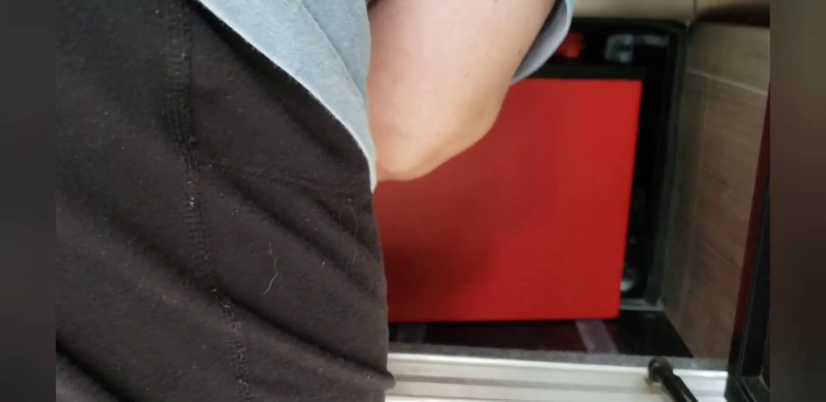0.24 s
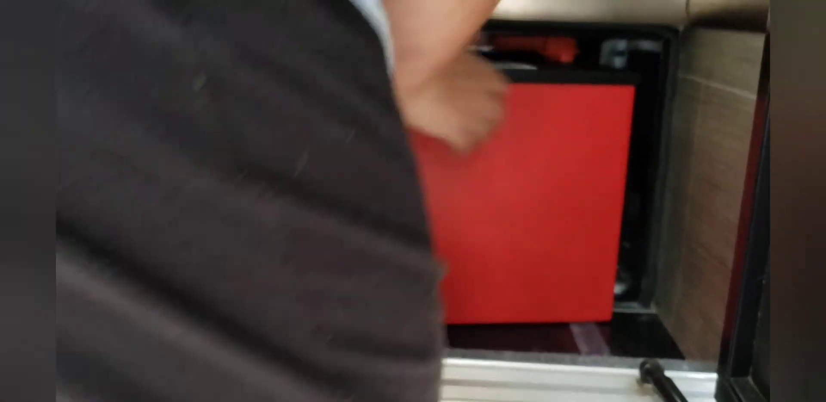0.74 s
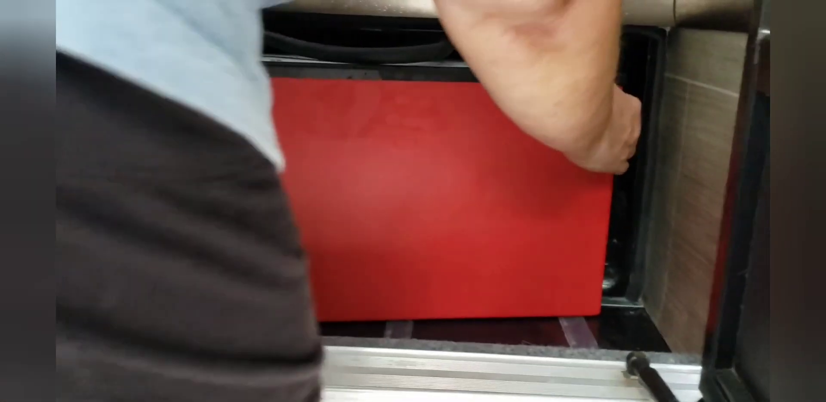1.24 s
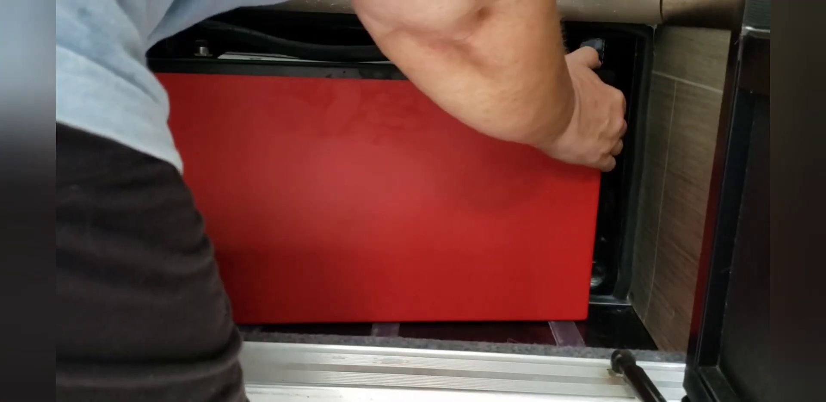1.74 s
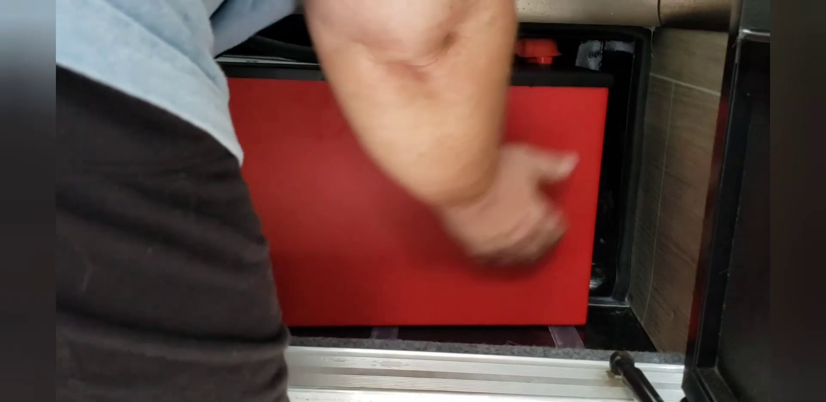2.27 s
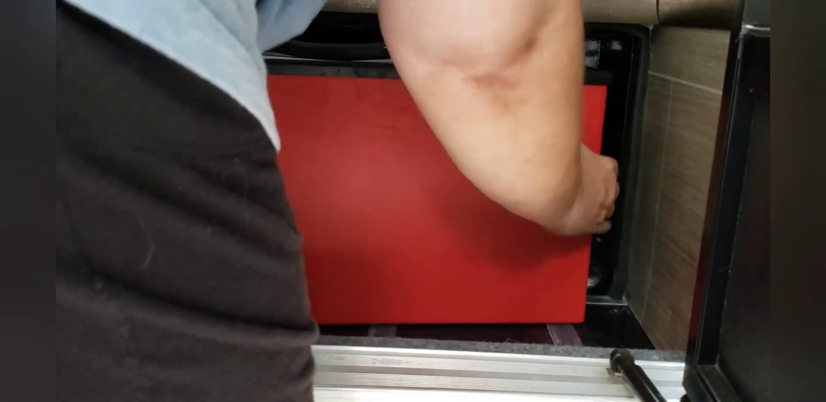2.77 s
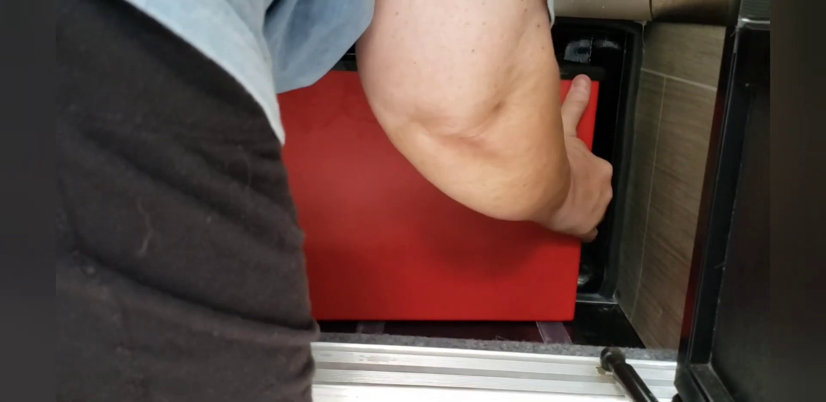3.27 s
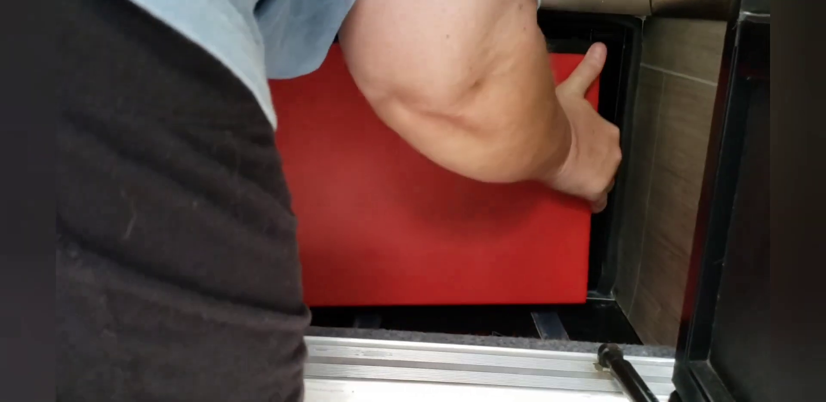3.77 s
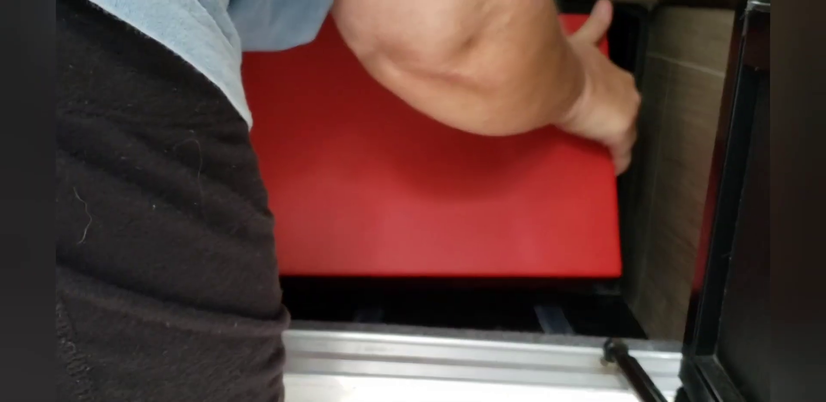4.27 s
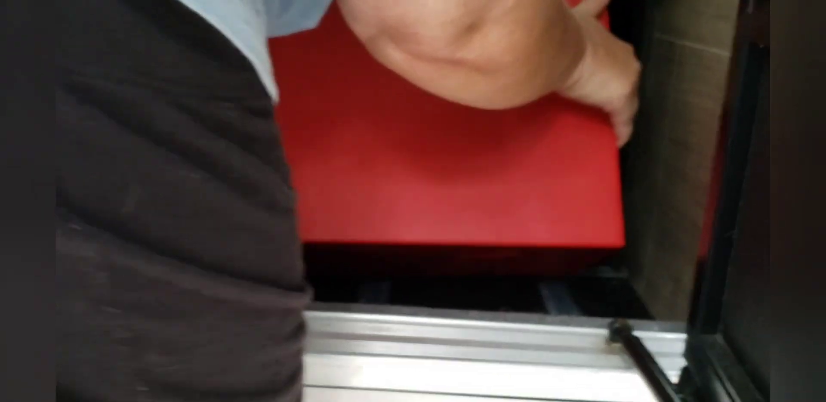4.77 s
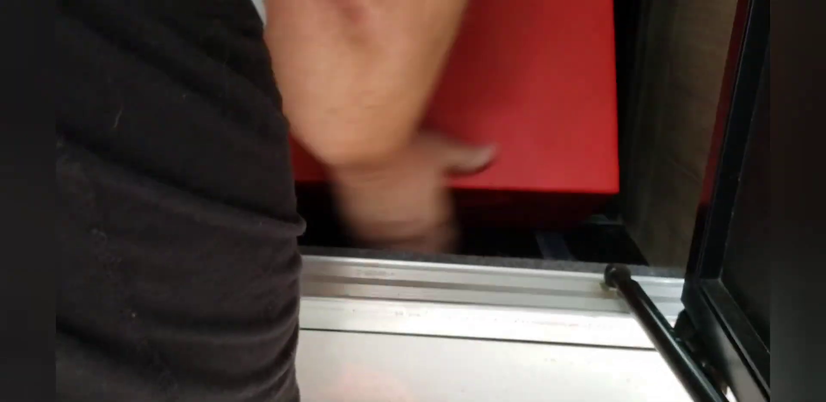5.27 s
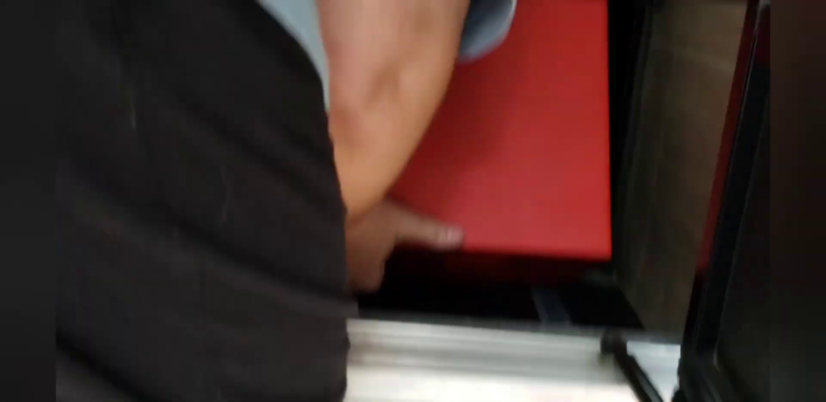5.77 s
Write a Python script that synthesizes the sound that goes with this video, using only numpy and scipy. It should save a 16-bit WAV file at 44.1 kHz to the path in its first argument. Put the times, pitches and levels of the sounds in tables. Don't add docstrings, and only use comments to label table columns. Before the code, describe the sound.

Close stereo pickup inside a small sheet-metal compartment. A heavy case thuds and scrapes briefly, then quiet handling and small ticks. It rocks with two hard snaps and ringing knocks, lands, groans slowly, skids and chatters in a long scrape, squeaks, then gives one very loud crack. Soft skin and cloth rubbing and a last shove follow. A low motor hums throughout.

```python
import sys
import numpy as np
from scipy import signal
from scipy.fft import rfft, irfft, next_fast_len
from scipy.io import wavfile

SR = 44100
rng = np.random.default_rng(int(sys.argv[2]) if len(sys.argv) > 2 else 0)


def natural_amplitude(level_db):
    exponent = np.asarray(level_db, float) / 20
    return 10 ** exponent


def transcribe(u):
    v = np.clip(np.atleast_2d(u).T, -1, 1)
    q = np.round(v * 32767).astype(np.int16)
    wavfile.write(sys.argv[1], SR, q)


N = 265041

LONG = next_fast_len(N + SR // 3)
HZ = np.maximum(np.fft.rfftfreq(LONG, 1 / SR), 1)
GROAN_LOSS_DB, SQUEAK_LOSS_DB = 9, 4.5


def friction():
    # frequency in Hz, level in dB per Hz.
    rumble_spectrum = [(35, 10), (60, 3.5), (151, 9.5), (246, -3), (324, 1), (500, -23.5), (650, -28),
                       (1100, -120)]
    drag_spectrum = [(180, 3.5), (300, 3), (562, -4), (662, -2.5), (749, -2.5), (1110, -4.5), (3500, -24),
                     (4550, -73), (7700, -120)]
    grit_spectrum = [(590, -40), (1000, -8), (1300, -5), (1600, -1), (2000, -6), (3000, -8), (8000, -14),
                     (10400, -28), (17600, -120)]
    rasp_spectrum = [(2940, -2), (5000, -2), (7450, 1.5), (9410, -0.5), (12100, -6), (16000, -4)]
    hiss_spectrum = [(2940, -12.5), (5000, -5), (6930, -1.5), (9100, 4), (10100, 0.5), (14700, 6.5),
                     (16000, 0)]
    # frequency in Hz, width in Hz, level in dB.
    shell_modes = [(1520, 200, 7), (2230, 140, 2.5), (620, 120, 4)]
    weight_db, drag_db, grit_db, hiss_db = handling()

    weight = colour(grains(900, 1.9), rumble_spectrum, ring_db=1.5)
    weight = weight * natural_amplitude(weight_db + 0.5 * drift(25))

    clumps = drift(22)
    drag = colour(grains(2500, 2.2), drag_spectrum, ring_db=1)
    drag = drag * natural_amplitude(drag_db + 0.7 * drift(30) + 0.6 * clumps)

    grit = colour(grains(3000, 3.6), grit_spectrum, ring_db=1)
    grit = grit * natural_amplitude(grit_db + 1.8 * clumps + 1.2 * drift(90))
    hum = sum(natural_amplitude(db) * resonate(grit, hz, width) for hz, width, db in shell_modes)
    grit = natural_amplitude(-5.0) * (grit + hum)

    fine = grains(15000, 3.8)
    hard = np.clip((grit_db - hiss_db + 9.0) / 7, 0, 1)
    rasp = np.sqrt(hard) * colour(fine, rasp_spectrum, ring_db=-30)
    soft = np.sqrt(1 - hard) * colour(fine[::-1], hiss_spectrum, ring_db=-35)
    hiss = (rasp + soft) * natural_amplitude(hiss_db + 0.5 * clumps + 1.3 * drift(40))
    return weight + drag + grit + hiss


def handling():
    # peak in seconds, seconds to rise 20 dB, seconds to fall 20 dB,
    # rumble in dB, panel drag above its usual share in dB.
    slides = [(.19, .04, .02, -45, -9), (.25, .035, .08, -31, -7), (.346, .015, .11, -35, -12),
              (1.448, .12, .05, -53, -9), (1.536, .1, .15, -53, -3), (1.69, .12, .14, -39, 1),
              (1.78, .06, .075, -38, -6), (1.97, .03, .03, -37, -11), (2.02, .04, .035, -35, -4),
              (2.17, .06, .07, -52, -1), (2.75, .06, .05, -57, 3), (3.16, .15, .08, -55, 1.5),
              (3.63, .12, .8, -66, 19), (3.75, .3, .4, -64, 20), (3.8, .05, .5, -43, 1),
              (3.93, .25, .2, -44, 1), (2.585, .005, .2, -48, .3), (4.085, .12, .3, -52, 12),
              (4.182, .16, .1, -35.5, 2.5), (4.96, .3, .1, -46, -7), (5.084, .005, .05, -49, 2.5),
              (5.796, .2, .3, -51, -9), (5.916, .15, .08, -45, -1), (5.388, .015, .15, -40, -5)]
    # peak in seconds, seconds to rise 20 dB,
    # seconds to fall 20 dB, grit in dB, hiss above its share in dB.
    rattles = [
        (1.738, .003, .045, -31, 2.5),
        (1.98, .003, .05, -35, -1.5),
        (2.584, .016, .14, -50, 5),
        (5.085, .002, .07, -38, -8),
        (5.101, .012, .012, -28, -11),
        (5.112, .01, .11, -45, -2),
        (5.376, .008, .05, -55, 7),
        (5.395, .04, .09, -53, 7),
        (5.91, .13, .11, -51, 5),
    ]
    # peak in seconds, seconds to rise 20 dB,
    # seconds to fall 20 dB, hiss in dB, grit above its share in dB.
    rubs = [(.344, .03, .05, -60, -5), (1.536, .07, .1, -61, -5), (1.71, .25, .1, -61, 8),
            (2.53, .05, .1, -66, -3), (3.8, .8, .8, -61, 6), (4.7, .3, .05, -56, -6),
            (4.99, .1, .3, -55, -4), (5.31, .05, .05, -60, -5), (5.525, .03, .25, -52, -20),
            (5.59, .14, .06, -47, -22), (5.647, .012, .03, -56, -10)]
    # start in seconds, length in seconds,
    # grit in dB, swell over the stroke in dB, rasp above its share in dB.
    scrapes = [
        (.2, .042, -32.5, 1, -1),
        (4.732, .11, -43, -2, 4),
        (4.86, .072, -51, 0, 10),
    ]
    eased_scrapes = [
        (4.105, 0.06, -38, -0.5, -5.5),
        (4.175, 0.055, -39.5, -3.5, -2.5),
        (4.308, 0.029, -45.5, -5.5, 0),
        (4.358, 0.099, -41, 2.5, -4.5),
        (4.47, 0.038, -38.5, -0.5, -8.5),
        (4.51, 0.026, -41, -2, -2),
    ]
    # level in dB, share of the last stroke column from 0 to 1, relative fall time.
    slide_mix = [(3, 0.01, 0.9), (2, 0.92, 0.55), (-24, 0.9, 0.21), (-18, 1, 0.97)]
    rattle_mix = [(-18, 0, 1.3), (-6, 0, 1.2), (0, 0, 1), (0, 1, .8)]
    rub_mix = [(-30, 0, 1), (-30, 0, 1), (0, 1, 1), (0, 0, 1)]
    scrape_mix = [(-40, 0, 1.3), (-0.5, 0.5, 1.8), (2, 0.58, 0.92), (0, 0.94, 0.73)]
    # time in seconds, level in dB.
    grip = [(0, -2), (.15, -1), (.4, 2.5), (.75, 6.5), (1.3, 6.5), (1.6, 3.5), (1.87, 1.5), (1.93, -0.5),
            (2.07, 0), (2.2, 5), (2.42, -0.5), (2.75, 4.5), (3.0, 4.5), (3.48, -2.5), (4.6, 5), (5.05, 6.5),
            (5.21, -16), (5.5, -15), (5.8, 7.5), (6.01, 1.5)]
    grip_mix_db = [-65, -66.5, -69.5, -70.5]

    grip_db = in_time(grip)[0][::32]
    power = natural_amplitude(2 * (grip_db + np.array(grip_mix_db)[:, None]))
    for rows, mix in (slides, slide_mix), (rattles, rattle_mix), (rubs, rub_mix):
        power += strokes([(s, rise, 1e-3, fall, db, 0, extra) for s, rise, fall, db, extra in rows], mix)
    for rows, attack_s in (scrapes, 0.004), (eased_scrapes, 0.025):
        held = [(s, attack_s, length, 0.042, *dbs) for s, length, *dbs in rows]
        power += strokes(held, scrape_mix)
    return [np.interp(np.arange(N), np.arange(0, N, 32), 10 * np.log10(layer)) for layer in power]


def strokes(rows, mix):
    t, power = np.arange(0, N, 32) / SR, 0
    share_db, share, slow = np.transpose(mix)[..., None]
    for s, rise_s, hold_s, fall_s, db, swell_db, extra_db in rows:
        held = np.clip(t - s, 0, hold_s)
        before = np.maximum(s - t, 0) / max(rise_s, 0.001)
        after = (np.maximum(t - s, 0) - held) / max(fall_s, 0.001)
        top_db = db + share_db + share * extra_db
        power += natural_amplitude(2 * (top_db + swell_db * held / hold_s - 20 * before - 20 * after / slow))
    return power


def grains(per_s, spread_db):
    chance = rng.random((2, N))
    caught = chance < per_s / SR
    sizes = natural_amplitude(spread_db * np.minimum(rng.exponential(1, (2, N)), 4) * caught)
    return np.where(chance < per_s / SR / 2, sizes, -sizes) * caught


def colour(x, spectrum, ring_db):
    # frequency in Hz, width in Hz, level in dB.
    panel = [(258, 21, 4), (513.1, 12.6, 16), (661, 126, 6.5), (839, 5.9, 14), (1052.6, 16, 11),
             (1492, 23, 4), (1747, 28, 5.5), (2160, 34, 9), (2486, 34, 2.5), (2644, 47, 11), (3010, 580, 1),
             (3960, 280, 8.5), (383.2, 51.4, 2.5), (6160, 73, 14)]
    modes = 0
    for k, (hz, width, db) in enumerate(panel):
        modes = modes + (-1) ** k * natural_amplitude(db) / (1 + 2j * (HZ - hz) / max(width, 8))
    return rms_one(to_time(to_hz(x) * natural_amplitude(at_hz(spectrum)) * (1 + natural_amplitude(ring_db) * modes)))


def thumps():
    # start in seconds, peak in dB, pitch in Hz, t60 in seconds.
    landings = [(0.2436, -13, 97.4, 0.13), (0.262, -21, 205, 0.096), (0.341, -25, 94, 0.11),
                (0.972, -29, 205, 0.037), (1.432, -26.5, 82, 0.066), (1.954, -31.5, 210.5, 0.27),
                (2.581, -24.5, 176, 0.032), (4.177, -30, 152.4, 0.32), (4.922, -26.5, 143, 0.091),
                (4.961, -35.5, 124.5, 0.26), (5.4, -28, 199, 0.17), (3.923, -27.5, 144, 0.13)]
    out, t = np.zeros(N), np.arange(SR // 3) / SR
    for s, db, hz, t60 in landings:
        swing = np.sin(2 * np.pi * hz * (t + 0.0033 * (1 - np.exp(-t / 0.049))))
        swing += 0.14 * np.sin(2 * np.pi * 2.31 * hz * t) * natural_amplitude(-60 * t / t60)
        i = round(s * SR)
        swing = (natural_amplitude(db - 60 * t / max(t60, 0.03)) * (1 - np.exp(-t / 0.0034)) * swing)[:N - i]
        out[i:i + len(swing)] += swing
    return out


def snaps():
    # start in seconds, peak in dB, pitch in Hz, t60 in seconds, left minus right in dB.
    bright = [(0.461, -47, 12100, 0.01, -7), (0.574, -53, 14500, 0.0087, -3),
              (0.7935, -33.5, 6000, 0.0091, -1), (0.85, -30, 3700, 0.021, -3),
              (1.381, -41.5, 12100, 0.011, -1), (1.4292, -39, 3280, 0.012, -4),
              (1.7447, -22.5, 4085, 0.067, -12), (1.9808, -22.5, 6100, 0.051, -10.5),
              (2.511, -45, 12000, 0.008, -10), (2.5194, -45, 11800, 0.01, -10),
              (2.536, -41, 12600, 0.0083, -10), (2.762, -47, 13000, 0.008, -5),
              (2.5845, -24.5, 4800, 0.0075, -8), (2.713, -36.5, 5100, 0.0047, -4),
              (5.0833, -31.5, 5400, 0.025, 17), (5.097, -14, 5800, 0.01, 6),
              (5.0995, -8, 3200, 0.014, -1.5), (5.1005, -7.5, 5800, 0.0058, 2),
              (5.1108, -43, 3460, 0.0086, 2), (5.312, -36.5, 7660, 0.0097, -5),
              (5.623, -47, 14000, 0.008, 0), (5.628, -44, 7500, 0.01, 3), (5.641, -35.5, 11300, 0.01, -1),
              (5.655, -48, 14000, 0.008, 0), (5.7, -44, 6700, 0.028, 8), (5.7309, -41.5, 6250, 0.017, 1)]
    return ticks(bright, 0.7, 0.45, 0.03)


def corner_knocks():
    # start in seconds, peak in dB, pitch in Hz, t60 in seconds, left minus right in dB.
    dull = [
        (0.337, -34.5, 528, 0.046, 1),
        (0.85, -45.5, 750, 0.049, -12),
        (1.957, -32, 544, 0.23, 1),
        (2.584, -38.5, 713, 0.035, -21),
        (3.575, -41, 680, 0.038, 2),
        (3.64, -40, 480, 0.066, 3),
        (3.812, -35, 688, 0.25, 8),
        (3.882, -28.5, 610, 0.053, 2),
        (5.374, -32.5, 500, 0.077, 0),
    ]
    return ticks(dull, 0.47, 0, 0.06)


def small_contacts():
    # start in seconds, peak in dB,
    # pitch in Hz, t60 in seconds, left minus right in dB.
    contacts = [(0.85, -31.5, 1350, 0.011, 2), (0.9761, -45, 1220, 0.016, -1),
                (1.4267, -44, 1000, 0.0062, 2), (1.5267, -34, 1390, 0.015, -3),
                (1.5444, -41, 1760, 0.02, 3), (1.7475, -18, 1630, 0.0068, -0.5),
                (1.9845, -20.5, 1570, 0.025, -9.5), (1.749, -22, 994, 0.021, 7),
                (0.343, -49, 1230, 0.027, 0), (5.0845, -31.5, 1080, 0.022, 0),
                (5.101, -19, 2220, 0.0059, 7), (5.6882, -43, 2860, 0.0092, -3),
                (5.7867, -46, 1120, 0.0065, -14),
                (3.912, -44.5, 4120, 0.023, -14),
    ]
    return ticks(np.array(contacts), 0.25, 0.14, 0.14)


def ticks(rows, breadth, crack_share, ring_share):
    out, t = np.zeros((2, N)), np.arange(SR // 8) / SR
    noise = rng.standard_normal((len(rows), SR // 8))
    for (s, db, hz, t60, pan_db), crack in zip(rows, noise):
        decay = natural_amplitude(-60 * t / max(t60, 0.003))
        burst = resonate(resonate(crack * decay, hz, breadth * hz), hz, 2.9 * breadth * hz)
        burst += ring_share * decay ** 0.49 * np.sin(2 * np.pi * hz * t)
        sharp = crack * natural_amplitude(-60 * t / 0.0051)
        burst += crack_share * resonate(resonate(sharp, 3600, 7600), 3700, 9300)
        burst *= 1 - np.exp(-t / 0.0005)
        i = round(s * SR)
        burst = (natural_amplitude(db) * burst / np.abs(burst).max())[:N - i]
        out[:, i:i + len(burst)] += burst * natural_amplitude([[0.7 * pan_db], [-0.3 * pan_db]])
    return out


def groans():
    # start in seconds, length in seconds, slips per second at start, at end, peak in dB.
    feet = [
        (0.172, 0.083, 248, 270, -33),
        (1.619, 0.1, 218, 238, -34.5),
        (1.665, 0.067, 257, 278, -33.5),
        (1.738, 0.038, 550, 515, -34.5),
        (5.873, 0.047, 187, 260, -48.5),
        (3.767, 0.111, 160, 198, -40.5),
        (3.8, 0.056, 220, 270, -39),
        (5.375, 0.053, 335, 164, -41),
    ]
    peak_share, edge_db = 0.38, -4.5
    out = np.zeros(N)
    for s, length, first, last, db in feet:
        glide = [(s, first, db + edge_db),
                 (s + peak_share * length, first + peak_share * (last - first), db),
                 (s + length, last, db + edge_db)]
        out += slips(glide, 0.0087, 4.4, GROAN_LOSS_DB, spit_db=-41, count=5)
    return out


def skid():
    # time in seconds, slips per second, level in dB.
    skidding = [(4.13, 97, -41), (4.16, 417, -33), (4.184, 490, -44.5), (4.215, 940, -35)]
    return slips(skidding, 0.06, 4, GROAN_LOSS_DB, -10, count=6)


def chatter():
    # time in seconds, slips per second, level in dB.
    even_slips = [(4.415, 540, -56), (4.44, 555, -47), (4.465, 560, -50), (4.49, 520, -58),
                  (4.51, 500, -53), (4.535, 495, -57)]
    return slips(even_slips, 0.012, 3, 2.5, -6, count=6)


def squeak():
    # time in seconds, slips per second, level in dB.
    rising = [(4.74, 440, -50), (4.775, 495, -44), (4.795, 555, -37), (4.803, 610, -45), (4.813, 685, -36),
              (4.823, 760, -42), (4.834, 860, -39), (4.845, 960, -46)]
    locked = [(4.844, 1300, -46), (4.853, 1336, -40), (4.866, 1285, -45), (4.876, 1240, -43),
              (4.887, 1262, -42), (4.894, 1400, -39), (4.905, 1510, -41), (4.921, 1450, -45),
              (4.93, 1440, -54)]
    out = slips(rising, 0.012, 2, SQUEAK_LOSS_DB, 2, count=8)
    return out + slips(locked, 0.008, 2, SQUEAK_LOSS_DB, 0, count=4)


def slips(rows, jitter, flutter_db, step_db, spit_db, count):
    # frequency in Hz, width in Hz, level in dB.
    case = [(1245, 110, -7), (1490, 200, 8), (2500, 110, 13), (2050, 500, 4), (3900, 900, 6),
            (6250, 400, 5)]
    first, last = round(rows[0][0] * SR), round(rows[-1][0] * SR)
    per_s, db = (curve[first:last] for curve in in_time(rows))
    n, size, out = np.arange(last - first), SR // 4, np.zeros(N)
    gate = np.clip(np.minimum(n, n[::-1]) / SR / 0.0056, 0, 1)
    phase = 2 * np.pi * np.cumsum(per_s * (1 + jitter * drift(109.0, size=size)[n])) / SR
    tones = 0
    for k in range(1, count + 1):
        case_db = sum(top_db / (1 + (2 * (k * per_s - hz) / width) ** 2) for hz, width, top_db in case)
        loss_db = step_db * min(k - 1, 2) + 1.5 * max(k - 3, 0)
        wobble_db = flutter_db * np.tanh(drift(66, size=size)[n])
        tones += natural_amplitude(db + case_db - loss_db + wobble_db) * np.sin(k * phase)
    spit = rng.standard_normal(size)[n] * np.exp(0.47 * (np.cos(phase) - 1))
    puffs = resonate(spit, 4000, 9200)
    out[first:last] = np.sqrt(2) * gate * (tones + natural_amplitude(db + spit_db) * puffs)
    return out


def singing():
    # start in seconds, length in seconds, frequency in Hz, level in dB.
    sung = [(.2, 0.049, 1730, -35), (.2, 0.045, 2850, -40), (.22, 0.032, 800, -37.5),
            (1.67, 0.036, 760, -44), (3.63, 0.146, 460, -50.5), (3.66, 0.15, 1120, -51.5),
            (3.79, .07, 690, -45), (3.87, 0.074, 900, -43), (3.78, 0.16, 1630, -52.5),
            (3.75, 0.16, 2290, -60), (4.16, 0.032, 2100, -56), (4.345, 0.067, 1550, -47),
            (4.42, 0.13, 1600, -50), (1.95, 0.084, 767, -48), (4.1, .12, 1540, -46),
            (5.375, 0.047, 523, -47), (4.73, .03, 1440, -47)]
    q = 9
    out, t = np.zeros(N), np.arange(SR // 4) / SR
    for (s, length, hz, db), rub in zip(sung, rng.standard_normal((len(sung), SR // 4))):
        tone = rms_one(resonate(resonate(rub, hz, hz / q), hz, hz / q))
        swell = np.sqrt(np.sin(np.pi * np.clip(t / length, 0, 1)) + 1e-12)
        i = round(s * SR)
        out[i:i + SR // 4] += natural_amplitude(db) * swell * tone
    return out


def compartment(points, patches, spread):
    tail_t60_s, tail_db = 0.07, -7
    near, far = to_hz(patches)
    direct = to_hz(points)
    opposed = echoed(direct + np.sqrt(1 - spread) * near) + np.sqrt(spread) * far
    heard = left_right(direct + near, opposed)
    t = np.arange(SR // 3) / SR
    tail = rng.standard_normal((2, len(t))) * natural_amplitude(-60 * t / tail_t60_s) * (1 - np.exp(-t / 0.0028))
    tail = left_right(*to_hz(tail / np.sqrt(np.sum(tail ** 2))))
    return np.sqrt(2) * to_time(heard * (1 + natural_amplitude(tail_db) * tail))


def echoed(spectrum):
    lags_s = [.0007, .0013, .0021, .0034]
    for lag_s in lags_s:
        late = np.exp(-2j * np.pi * HZ * lag_s)
        spectrum = spectrum * (late - 0.55) / (1 - 0.43 * late)
    return spectrum


def left_right(mid, side):
    # frequency in Hz, left-right likeness.
    likeness = [(60, 1), (130, 0.89), (290, 0.97), (640, 0.94), (1410, -0.65), (3100, -0.9), (6820, -1.2),
                (15000, 0.35)]
    alike = np.clip(at_hz(likeness), 0, 1)
    return np.sqrt((1 + alike) / 2) * mid + np.sqrt((1 - alike) / 2) * side * [[1], [-1]]


def motor():
    # multiple of the shaft rate, level in dB.
    orders = [(1, -69), (2, 2), (3, -7), (4, -5), (5, -13.5), (6, -25)]
    # time in seconds, level in dB.
    whine_level = [(.38, -77), (.43, -64), (.56, -61.5), (.8, -70), (1.1, -75), (1.4, -63), (1.6, -71),
                   (2.3, -68), (4, -72)]
    shaft_hz, hum_db = 29.78, -46
    whine_hz, width_hz = 2070, 230
    phase = 2 * np.pi * np.cumsum(shaft_hz * (1 + 0.0062 * drift(1.04))) / SR
    hum = 0
    for k, db in orders:
        level = natural_amplitude(hum_db + db + 2.0 * drift(9.5))
        hum = hum + level * np.sin(k * phase + rng.uniform(0, 2 * np.pi))
    whine = resonate(resonate(rng.standard_normal(N), whine_hz, width_hz), whine_hz, width_hz)
    return hum + natural_amplitude(in_time(whine_level)[0]) * rms_one(whine)


def air():
    # frequency in Hz, level in dB per Hz.
    air_spectrum = [(22, -56), (71, -0.5), (141, -10.5), (260, -17.5), (2120, -32.5), (7470, -40),
                    (8740, -50.5), (11700, -37.5)]
    pair = left_right(*to_hz(rng.standard_normal((2, N))) * natural_amplitude(at_hz(air_spectrum)))
    return natural_amplitude(-47 - 3.0 + 0.45 * drift(4.5)) * rms_one(to_time(pair))


def drift(rate, size=N):
    r = np.exp(-32 * np.pi * rate / SR)
    chance = rng.standard_normal(max(size, SR) // 16 + 3002)
    slow = signal.lfilter([1], [1, -2 * r, r * r], chance)[3000:]
    return np.interp(np.arange(size) / 16, np.arange(len(slow)), rms_one(slow))


def resonate(x, hz, width):
    r = np.exp(-np.pi * width / SR)
    poles = [1, -2 * r * np.cos(2 * np.pi * hz / SR), r * r]
    return signal.lfilter([(1 - r * r) / 2, 0, (r * r - 1) / 2], poles, x)


def rms_one(x):
    return x / np.sqrt(np.mean(x ** 2) + 1e-20)


def in_time(rows):
    s, *columns = np.transpose(rows)
    return [np.interp(np.arange(N) / SR, s, c) for c in columns]


def at_hz(points):
    hz, value = np.transpose(points)
    return np.interp(np.log(HZ), np.log(hz), value)


def to_hz(x):
    return rfft(x, LONG)


def to_time(spectrum):
    return irfft(spectrum, LONG)[..., :N]


def scene():
    patches = friction()
    knocks = thumps() + snaps() + corner_knocks() + small_contacts()
    rubber = groans() + skid() + chatter() + squeak() + singing()
    hum = to_hz(motor())
    behind = np.sqrt(2) * to_time(left_right(hum, echoed(hum)))
    return compartment(rubber + knocks, patches, spread=0.37) + behind + air()


def roll_off(x):
    return signal.sosfilt(signal.butter(12, 16990, fs=SR, output="sos"), x)


def record(dry):
    # frequency in Hz, left minus right in dB.
    balance = [(60, -4), (150, 0.5), (380, -6.5), (950, -10), (2380, -4.5), (5980, -0.5), (15000, -10)]
    # frequency in Hz, level in dB.
    mic = [(20, -31), (50, -3), (7000, -1.5), (9000, -7), (11500, 1.5), (16000, -2.5)]
    sides_db = at_hz(balance) * np.array([[0.5], [-0.5]])
    top_cut_db = -51 * (HZ > 15900) - 60 * (HZ > 16800)
    mix = to_time(to_hz(dry) * natural_amplitude(sides_db + at_hz(mic) + top_cut_db))
    return roll_off(mix)


dry = scene()
out = record(dry)
transcribe(out)
```